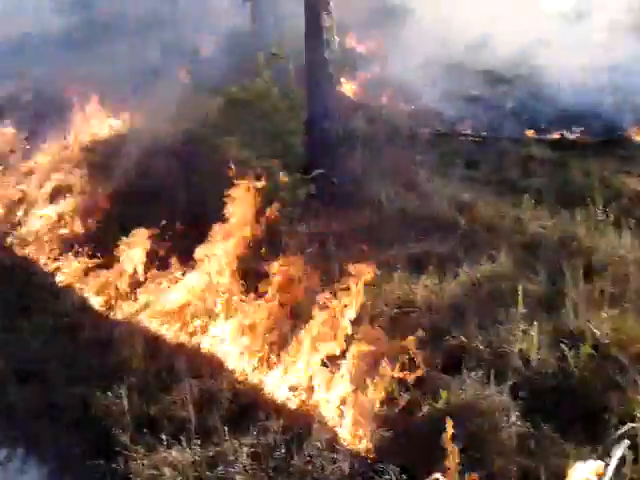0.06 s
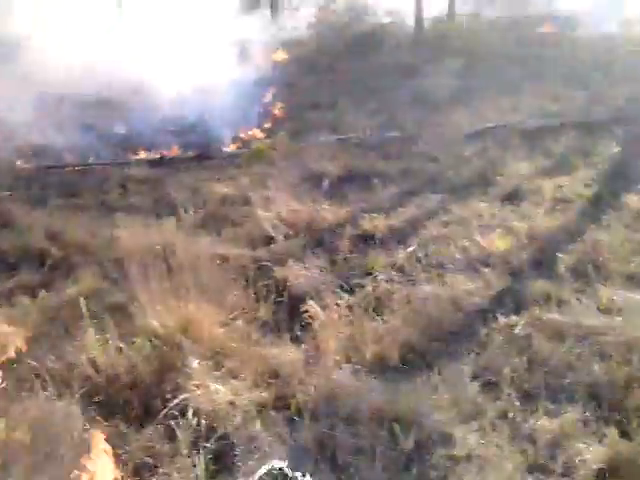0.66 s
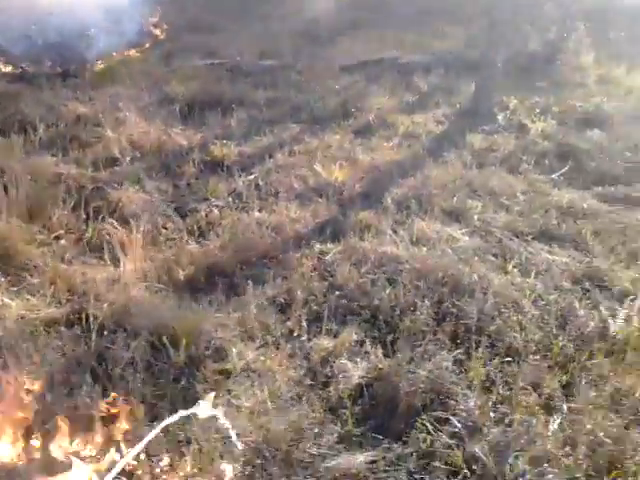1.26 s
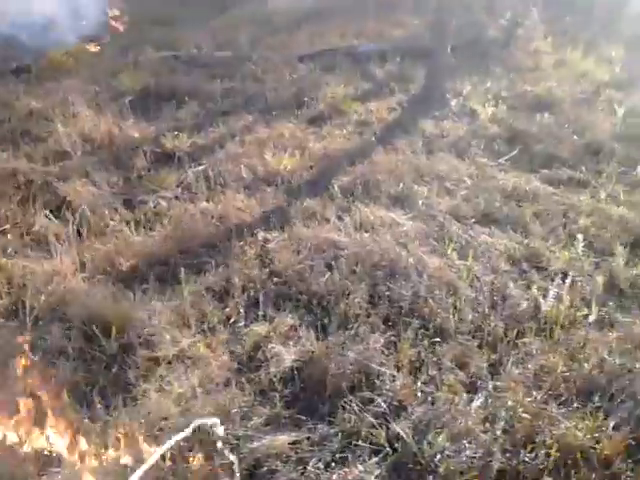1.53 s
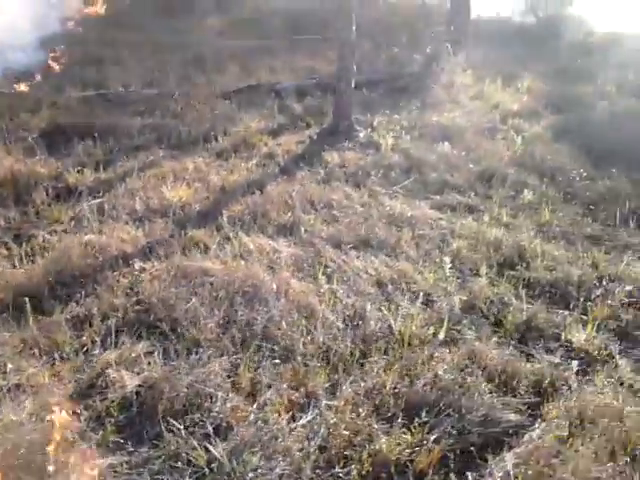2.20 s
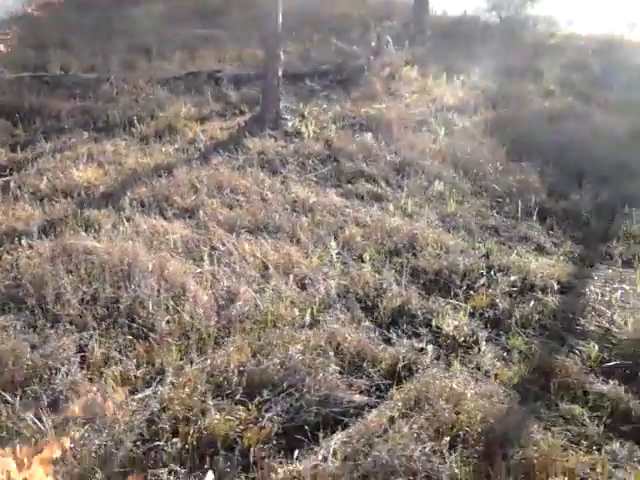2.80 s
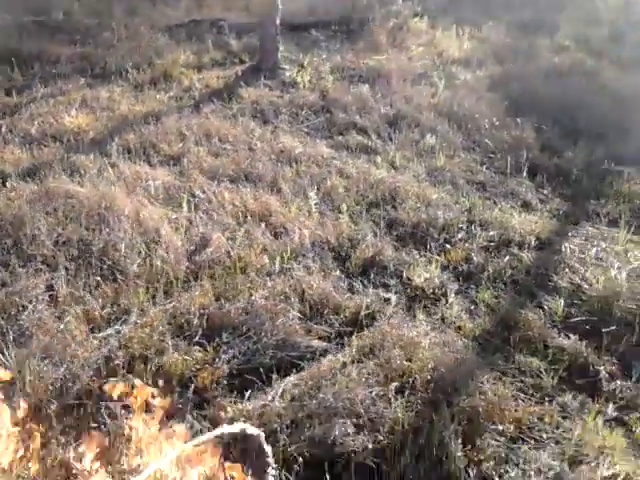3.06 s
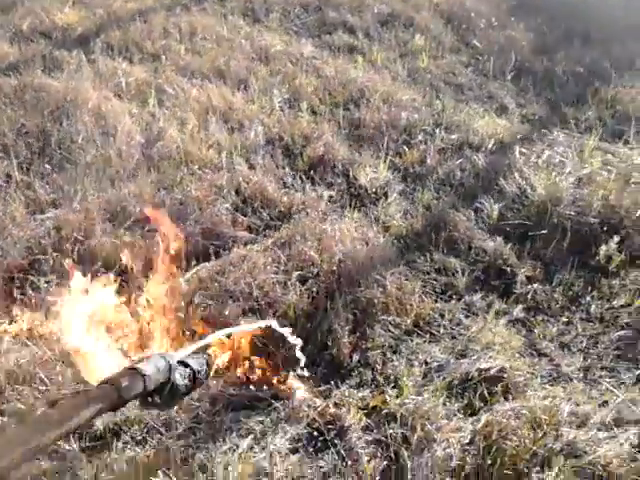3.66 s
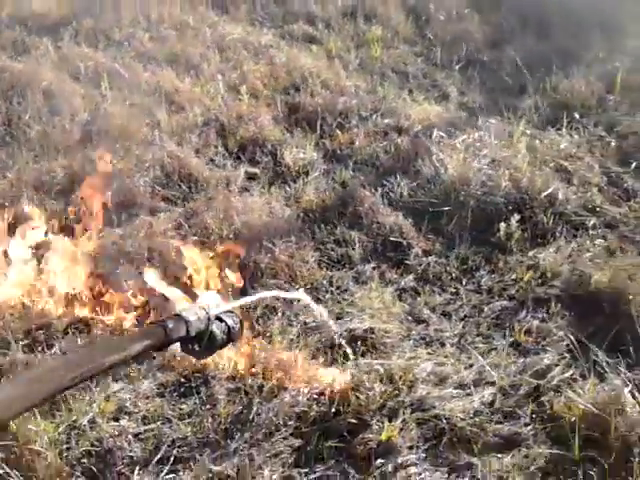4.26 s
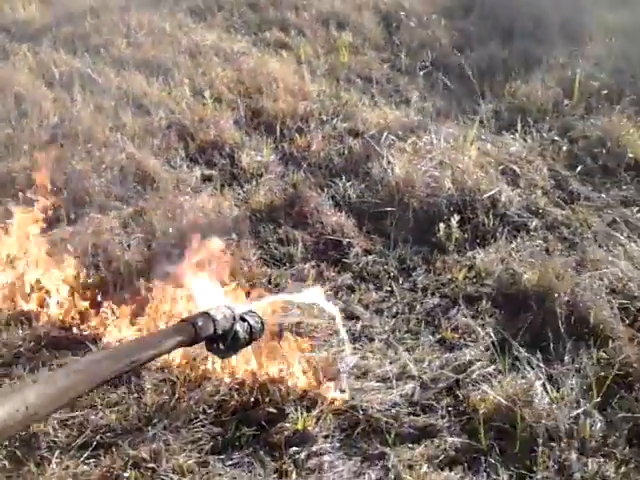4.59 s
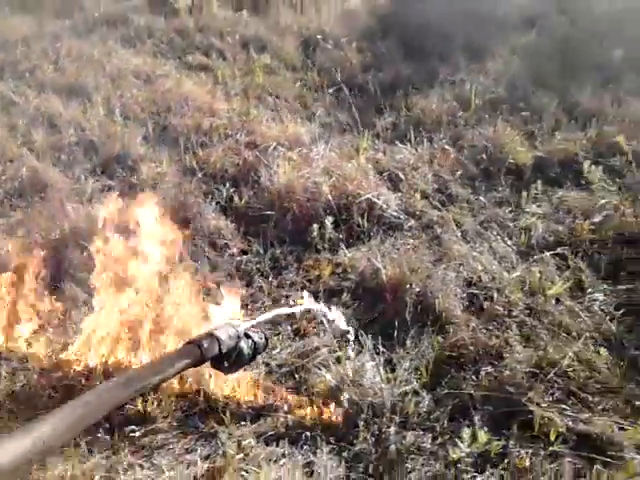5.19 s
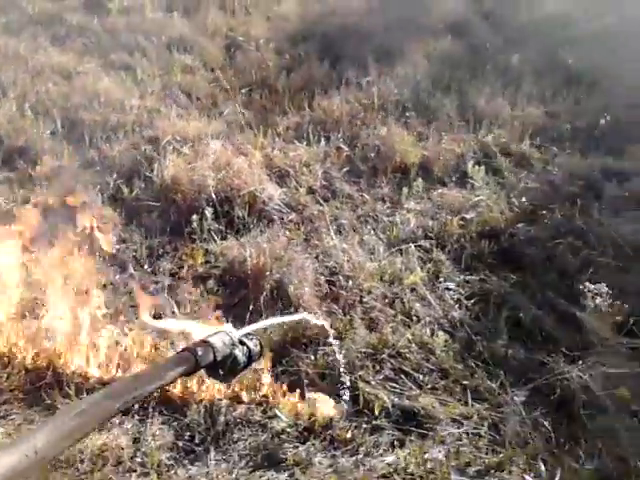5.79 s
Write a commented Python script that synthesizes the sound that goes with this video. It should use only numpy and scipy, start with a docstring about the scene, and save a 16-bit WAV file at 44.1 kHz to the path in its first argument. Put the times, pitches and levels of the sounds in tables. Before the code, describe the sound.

A grass fire burns in open woodland beside a vehicle whose engine idles with a low, steady rumble. Dry stems snap and crackle close to the microphone over the soft roar of the flames, most sharply at first. The snaps thin out, and there is one dull wooden knock about halfway. Toward the end, fresh grass crunches and catches in short puffs as burning fuel dribbles onto it.

```python
"""Open woodland: dry grass burns beside a slowly rolling vehicle, its eight-cylinder engine idling.
Stems snap and crackle over the soft roar of the flames, most of all at first, near the tall fire.
One dull wooden knock. Then a torch dribbles burning fuel on fresh grass,
which crunches and catches in short flares."""
import sys
import numpy as np
from scipy import signal
from scipy.fft import rfft, irfft
from scipy.io import wavfile

SR = 44100
rng = np.random.default_rng(int(sys.argv[2]) if len(sys.argv) > 2 else 0)


def transcribe(u):
    """Save the signal u as a 16-bit wav file named by the first command-line argument.

    u: samples, shape (n,) or (channels, n), limited to [-1, 1]; the rate is SR.
    q: integer samples, one column per channel.
    """
    v = np.clip(np.atleast_2d(u).T, -1, 1)
    q = np.round(v * 32767).astype(np.int16)
    wavfile.write(sys.argv[1], SR, q)


N = 266805
TIME_S = np.arange(N) / SR

# idle speed: time_s, firing_hz
IDLE_SPEED = [(0, 61.63), (0.3, 61.8), (0.6, 62.97), (1.05, 61.72), (1.22, 59.84), (1.38, 60.79),
              (1.98, 60.85), (2.14, 59.53), (2.62, 61.74), (3.19, 59.96), (3.38, 61.14), (3.77, 59.7),
              (4.33, 61.55), (4.63, 57.97), (5.3, 60.02), (5.55, 58.93), (5.75, 59.82), (6.05, 59.24)]
# exhaust tones: cycle_multiple, level_db, swell_db_per_firing_hz
EXHAUST_TONES = [(3, -66, 2.5), (5, -52, 1), (8, -30.5, 0), (11, -36.5, 1), (12, -50.5, 2.5),
                 (13, -36.5, -0.5), (16, -52, 0.5), (19, -56, -3.5), (24, -39.5, 1.06), (25, -49, 1.5),
                 (26, -48, -0.5), (27, -44.5, 3), (28, -68, 7), (29, -66.5, -3), (35, -54, 0),
                 (43, -53.5, 2), (45, -52.5, -0.5), (48, -56.5, -2.5), (59, -56, -1.5)]
# cylinders in firing order: bank_index
CYLINDER_BANK = np.array([0, 1, 1, 0, 1, 0, 0, 1])
# engine noise spectrum: freq_hz, density_db
RUMBLE_SPECTRUM = [(15, -8.5), (45, -3.5), (68, 1), (105, 1.5), (135, -0.5), (160, -2), (195, 4.5),
                   (230, 1), (350, -1.5), (500, -6.5), (800, -12), (2000, -16), (7000, -47.5)]
# flame roar envelope: time_s, level_db
ROAR_LEVEL = [(0, -43.5), (0.8, -43.5), (1.05, -41), (1.5, -41), (3.2, -41), (5.0, -42), (6.05, -42.5)]
# flame roar spectrum: freq_hz, density_db
ROAR_SPECTRUM = [(100, -8.5), (400, -2.5), (700, 1), (950, 2), (1150, -1.5), (1600, 1), (1950, 1.5),
                 (2150, -3), (2600, -11), (4000, -5.5), (7500, -19)]
# burn intensity, drives sizzle and crackle: time_s, relative_db
BURN_LEVEL = [(0.0, -47.5), (0.49, -43), (0.79, -49), (1.09, -45), (1.41, -46), (1.85, -44.5), (2.4, -46.5),
              (3.47, -51), (3.89, -48.5), (4.52, -52), (4.9, -48.5), (5.09, -59), (5.36, -46.5),
              (5.61, -52), (6.05, -48)]
# far crackle spectrum: freq_hz, density_db
SIZZLE_SPECTRUM = [(300, -22), (1200, -2), (3000, 3), (5000, -0.5), (7500, -6.5)]
# near stem bursts: start_s, relative_db, low_hz, high_hz, ring_hz
STEM_SNAPS = [(0.0702, -28.5, 1000, 3000, 2400), (0.1551, -32, 600, 3400, 3700),
              (0.248, -26.5, 2300, 4800, 4100), (0.293, -18.5, 1300, 9000, 2730),
              (0.2998, -25, 2000, 4000, 2730), (0.336, -28, 2000, 3420, 2950),
              (0.3833, -28, 1600, 2820, 2210), (0.4151, -15.5, 603, 3400, 1400),
              (0.4795, -36, 1600, 2800, 2200), (0.547, -29.5, 1600, 2800, 2820),
              (0.6508, -33.0, 2000, 4000, 2600), (0.7022, -24.5, 2000, 4200, 4200),
              (0.7147, -29, 3000, 5400, 4200), (0.7244, -19.5, 600, 9000, 4400),
              (0.7701, -17, 2000, 4300, 3520), (0.8352, -26.5, 2500, 3930, 3180),
              (0.9271, -24.5, 1800, 3600, 3060), (0.9577, -32, 2500, 5400, 5440),
              (1.0063, -14, 696, 4000, 3300), (1.0382, -22, 2500, 5000, 5300),
              (1.0656, -25.5, 600, 3400, 1400), (1.0697, -29, 1000, 6500, 2700),
              (1.1039, -16, 750, 3300, 1520), (1.1093, -28, 700, 2400, 1200),
              (1.1203, -23, 2500, 4000, 2270), (1.133, -29, 2200, 5000, 3000),
              (1.137, -21, 1600, 5400, 3000), (1.206, -25.5, 800, 5400, 2400),
              (1.441, -28, 2000, 4640, 4500), (1.665, -31.5, 1600, 2800, 2900),
              (1.6756, -28, 1000, 3380, 3600), (1.7208, -26, 600, 4600, 4200),
              (1.824, -25.5, 800, 5400, 3100), (1.8455, -16.5, 1000, 9000, 5400),
              (2.0406, -26, 1000, 9000, 5960), (2.0474, -31, 1600, 6500, 6850),
              (2.103, -32.5, 1600, 3400, 3200), (2.1277, -36, 1600, 4500, 3000),
              (2.232, -29.5, 600, 9000, 3130), (2.2895, -32.5, 1800, 5000, 2700),
              (2.4996, -28, 2500, 4600, 3120), (2.5487, -29, 1600, 9000, 2500),
              (2.682, -28.5, 800, 6500, 6930), (3.0448, -27, 1300, 4000, 1400),
              (3.0725, -32, 3800, 8000, 4400), (3.0834, -30, 2000, 9000, 6340),
              (3.6394, -27, 2000, 8000, 6100), (3.9232, -20.5, 1300, 9000, 6000),
              (3.957, -29, 2500, 8000, 2300), (3.9819, -26.5, 1000, 6000, 2800),
              (4.015, -28, 800, 5400, 5600), (4.0564, -23, 2000, 9000, 6450),
              (4.2803, -32.0, 2500, 5400, 2300), (4.4337, -36, 600, 4600, 1500),
              (4.6223, -32, 3000, 4600, 4800), (4.7126, -28.5, 1600, 5500, 3000),
              (5.229, -36, 2400, 4000, 2900), (5.253, -32.5, 3020, 4600, 3020),
              (5.3027, -31.0, 603, 6500, 1700), (5.587, -31.5, 2500, 4000, 2800),
              (5.7189, -28.5, 600, 2830, 1020), (5.9323, -35.5, 2000, 3400, 3700)]
# wood modes: pitch_hz, relative_db
KNOCK_MODES = [(540, 6.0), (860, 8.5), (1350, -18.5), (1800, -5)]
# fresh grass burn envelope: time_s, relative_db
CRUNCH_LEVEL = [(4.15, -64), (4.33, -49.5), (4.48, -49.5), (4.66, -54), (4.8, -66), (5.15, -52),
                (5.25, -48), (5.4, -54.5), (5.8, -50.5), (6.05, -51)]
# fresh grass click spectrum: freq_hz, density_db
CRUNCH_SPECTRUM = [(600, -14), (1200, -5), (1520, 1.5), (1900, -4), (2550, -11.5), (3400, -8.5),
                   (4000, -6.5), (4500, 0), (7000, -17)]
# fuel flares: peak_s, level_db, pitch_hz
FUEL_FLARES = [(4.322, -37, 1500), (4.399, -27.5, 1470), (4.437, -37, 1550), (4.464, -29.5, 1500),
               (4.512, -38, 1480), (4.546, -37, 1590), (4.577, -36, 1550), (4.658, -32, 1440),
               (5.124, -30, 1500), (5.396, -33.5, 1420), (5.635, -32.5, 1540), (5.72, -28.5, 1470),
               (5.897, -33, 1500), (5.984, -32.5, 1620), (6.033, -32.5, 1480)]
# flare spectrum: pitch_multiple, density_db
FLARE_SPECTRUM = [(0.3, -14.5), (0.55, -6.5), (0.75, 1), (0.86, -8), (1.02, 3), (1.3, -0.5), (1.7, -11.5),
                  (2, -6), (2.4, -14), (4.7, -20)]
# small microphone response; the treble also falls away steeply above 7.5 kHz: freq_hz, gain_db
MIC_RESPONSE = [(1100, 0), (1930, 1.5), (2130, -5), (2700, -2.5), (3050, -2), (3550, -3), (3950, -7.5),
                (4480, -5.5), (4900, -8), (5450, -4.5), (5950, -6), (6800, -2), (7150, -7.5), (7480, -19.5),
                (7750, -34)]


def gain_of(db):
    """Decibels to amplitude factor."""
    return 10 ** (np.asarray(db) / 20)


def unit_rms(x):
    """Scale to rms 1."""
    return x / np.sqrt(np.mean(x ** 2) + 1e-20)


def spectrum_gain(spectrum, hz):
    """Amplitude factor at hz, interpolated in log frequency."""
    freq_hz, db = np.transpose(spectrum)
    return gain_of(np.interp(np.log(hz + 1), np.log(freq_hz + 1), db))


def follow(curve):
    """Curve value at every sample."""
    return np.interp(TIME_S, *np.transpose(curve))


def add(mix, start_s, sound):
    """Mix a sound in at start_s."""
    part = mix[max(round(start_s * SR), 0):][:len(sound)]
    part += sound[:len(part)]


def coloured(x, spectrum):
    """Filter by a spectrum; rms 1."""
    hz = np.fft.rfftfreq(len(x), 1 / SR)
    return unit_rms(irfft(rfft(x) * spectrum_gain(spectrum, hz), len(x)))


def noise(spectrum):
    """Steady shaped noise; rms 1."""
    return coloured(rng.standard_normal(N), spectrum)


def drift(rate_hz, size=4096):
    """Smooth random wander up to about rate_hz; rms 1."""
    hz = np.fft.rfftfreq(size, N / SR / size)
    slow = irfft(rfft(rng.standard_normal(size)) / (1 + (hz / rate_hz) ** 4))
    return unit_rms(np.interp(TIME_S, np.linspace(0, N / SR, size), slow))


def grains(per_s, size, spread_db=4):
    """Random train of uneven clicks."""
    strength = rng.choice([-1, 1], size) * gain_of(spread_db * rng.standard_normal(size))
    return strength * (rng.random(size) < per_s / SR)


def engine(start_cycles=0.798, lag_firings=0.2, waver=0.0078, waver_hz=2.5,
           muffler_hz=66, muffler_width_hz=10, resonance=1.6):
    """Two cylinder banks fire: tones over rumble. One bank's longer pipe and the muffler set phases."""
    cylinders = len(CYLINDER_BANK)
    firing_hz = follow(IDLE_SPEED)
    mean_hz = firing_hz.mean()
    cycles = start_cycles + np.cumsum(firing_hz) / SR / cylinders
    arrival_cycles = (np.arange(cylinders) + lag_firings * CYLINDER_BANK) / cylinders
    exhaust = np.zeros(N)
    for order, level_db, swell_db_per_hz in EXHAUST_TONES:
        tone_hz = order * mean_hz / cylinders
        muffler = 1 + resonance / (1 + 2j * (tone_hz - muffler_hz) / muffler_width_hz)
        phase_rad = np.angle(muffler * np.exp(-2j * np.pi * order * arrival_cycles).sum())
        # tones slide in and out of pipe resonances
        strength = gain_of(level_db + swell_db_per_hz * (firing_hz - mean_hz))
        uneven = 1 + waver * order * drift(waver_hz)  # uneven combustion shakes high tones most
        exhaust += np.sqrt(2) * strength * uneven * np.cos(2 * np.pi * order * cycles + phase_rad)
    return exhaust + rumble(cylinders * cycles)


def rumble(firings, level_db=-37, throb=0.23):
    """Gas and machinery noise, swelling with each firing."""
    pulse = 1 + throb * np.cos(2 * np.pi * firings)
    return gain_of(level_db) * unit_rms(noise(RUMBLE_SPECTRUM) * pulse)


def flames(flutter_db=1, flutter_hz=25, sizzle_db=-2, flicker_db=2.6, flicker_hz=140):
    """Turbulent hot air roars; far crackles merge into a flickering sizzle."""
    roar = noise(ROAR_SPECTRUM) * gain_of(follow(ROAR_LEVEL) + flutter_db * drift(flutter_hz))
    sizzle = noise(SIZZLE_SPECTRUM) * gain_of(follow(BURN_LEVEL) + sizzle_db)
    return roar + sizzle * gain_of(flicker_db * drift(flicker_hz))


def crack(low_hz, high_hz, ring_hz, ring_gain, ring_width_hz=280,
          splinter_gain=0.06, splinter_s=0.0024, scatter_gain=0.016, scatter_s=0.012):
    """One stem bursts: pressure spike, splintering fibres, scatter off grass, hollow stem ring."""
    t = np.arange(2048) / SR
    envelope = splinter_gain * np.exp(-t / splinter_s) + scatter_gain * np.exp(-t / scatter_s)
    burst = rng.standard_normal(len(t)) * envelope
    burst[0] = 1  # pressure spike
    burst = signal.lfilter(*signal.butter(2, low_hz, "highpass", fs=SR), burst)
    burst = signal.lfilter(*signal.butter(2, high_hz, fs=SR), burst)
    burst /= np.sqrt(np.mean(burst[t < 0.0015] ** 2))  # attack at rms 1
    ring = signal.lfilter(*signal.iirpeak(ring_hz, ring_hz / ring_width_hz, SR), burst)
    return burst + ring_gain * ring


def crackle(per_s=60, gain_db=4.5, spread_db=2.5, cap_db=6, low_hz=1700, high_hz=5600, pitches=30):
    """Thin blades and stems burst at random pitches and times; many faint, a few sharp."""
    out, burn_db = np.zeros(N), follow(BURN_LEVEL)
    for hz in np.geomspace(low_hz, high_hz, pitches):
        onsets = np.flatnonzero(rng.random(N) < per_s / pitches / SR)
        size_db = np.minimum(spread_db * rng.exponential(1, N)[onsets], cap_db)
        clicks = np.zeros(N)
        clicks[onsets] = gain_of(burn_db[onsets] + gain_db + size_db)
        burst = crack(0.58 * hz, 1.4 * hz, hz, ring_gain=1.67, splinter_gain=0.1)
        out += signal.oaconvolve(clicks, burst)[:N]
    return out


def snaps(gain_db=-1, light_db=-30, hard_db=-18, light_ring=1.4, hard_ring=0.5):
    """Near stems burst singly: light ones ring like wood, hard ones are a dry spike."""
    out = np.zeros(N)
    for start_s, relative_db, low_hz, high_hz, ring_hz in STEM_SNAPS:
        ring_gain = np.interp(relative_db, [light_db, hard_db], [light_ring, hard_ring])
        add(out, start_s, gain_of(relative_db + gain_db) * crack(low_hz, high_hz, ring_hz, ring_gain))
    return out


def woodland_echo(x, wet_db=-13, t60_s=0.23, taps_per_s=1500):
    """Direct sound plus a thin, short echo off trunks and ground."""
    t = np.arange(SR // 2) / SR
    taps = rng.standard_normal(len(t)) * (rng.random(len(t)) < taps_per_s / SR)
    taps *= gain_of(-60 * t / t60_s)
    return x + gain_of(wet_db) * signal.oaconvolve(x, taps / np.linalg.norm(taps))[:N]


def knock(start_s=2.7765, gain_db=-29, decay_s=0.0012):
    """One dull wooden knock: heavily damped modes."""
    out, t = np.zeros(N), np.arange(SR // 20) / SR
    ring = sum(gain_of(db) * np.sin(2 * np.pi * hz * t) for hz, db in KNOCK_MODES)
    add(out, start_s, gain_of(gain_db) * ring * np.exp(-t / decay_s))
    return out


def crunch(clicks_per_s=220, sputter_db=3.5, sputter_hz=30, ring_band_hz=(2800, 3060), ring_db=-3):
    """Freshly lit blades crisp and curl: tiny clicks, each with a thin ring."""
    clicks = grains(clicks_per_s, N)
    ring = unit_rms(signal.lfilter(*signal.butter(1, ring_band_hz, "bandpass", fs=SR), clicks))
    envelope = gain_of(follow(CRUNCH_LEVEL) + sputter_db * drift(sputter_hz))
    return (coloured(clicks, CRUNCH_SPECTRUM) + gain_of(ring_db) * ring) * envelope


def flares(grains_per_s=4000, lead_s=0.03, rise_s=0.0073, fall_s=0.0091, linger_db=-13, linger_s=0.026):
    """Fuel catches on grass: short, hollow, grainy puffs with a faint tail."""
    out, t = np.zeros(N), np.arange(SR // 5) / SR - lead_s
    fall = np.hypot(np.exp(-t / fall_s), gain_of(linger_db) * np.exp(-t / linger_s))
    envelope = np.minimum(np.exp(t / rise_s), fall)
    for peak_s, level_db, pitch_hz in FUEL_FLARES:
        puff = coloured(grains(grains_per_s, len(t)), np.array(FLARE_SPECTRUM) * [pitch_hz, 1])
        add(out, peak_s - lead_s, gain_of(level_db) * envelope * puff)
    return out


def scene():
    """Engine and flames dry, short sounds with echo; mono."""
    bed = engine() + flames()
    transients = snaps() + crackle() + flares() + crunch() + knock()
    return (bed + woodland_echo(transients))[None]


def record(dry, cutoff_hz=8823, mic_taps=2048):
    """Minimum-phase colour: microphone response and a steep treble fall above 7.5 kHz, then low-pass."""
    log_gain = np.log(spectrum_gain(MIC_RESPONSE, abs(np.fft.fftfreq(mic_taps, 1 / SR))))
    mic_impulse = np.fft.ifft(np.exp(np.conj(signal.hilbert(log_gain)))).real
    heard = signal.oaconvolve(dry, mic_impulse[None])[:, :N]
    lowpass = signal.firwin(401, cutoff_hz, window=("kaiser", 8), fs=SR)
    return signal.oaconvolve(heard, lowpass[None], "same")


dry = scene()
out = record(dry)
transcribe(out)
```